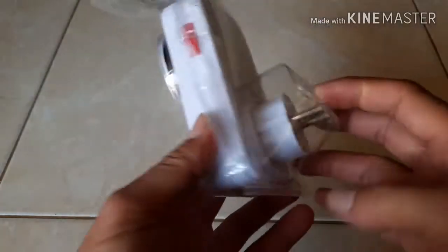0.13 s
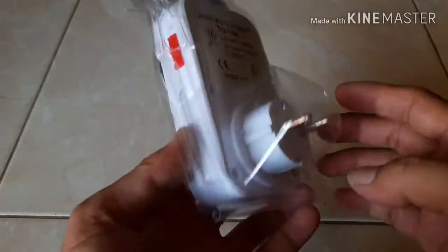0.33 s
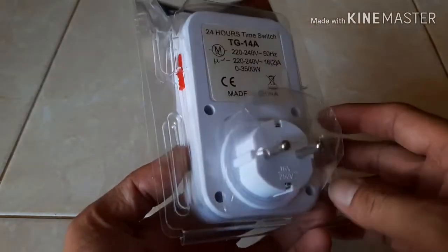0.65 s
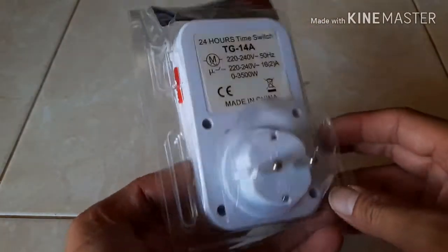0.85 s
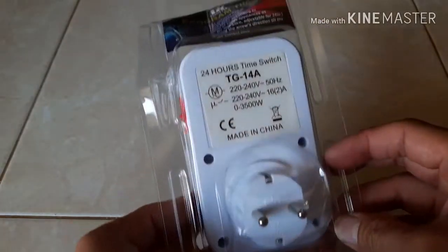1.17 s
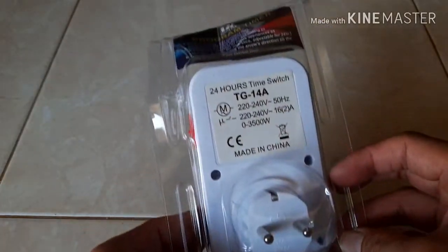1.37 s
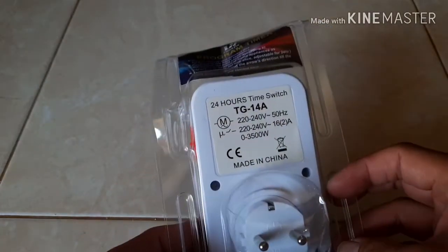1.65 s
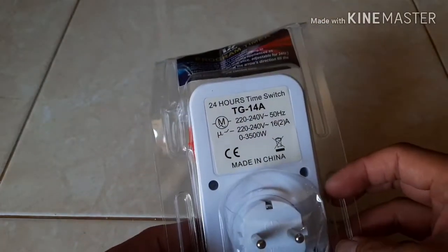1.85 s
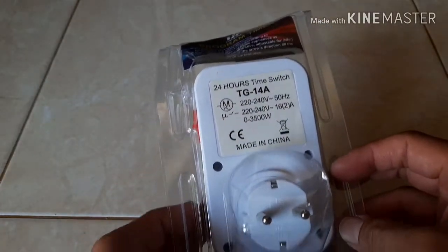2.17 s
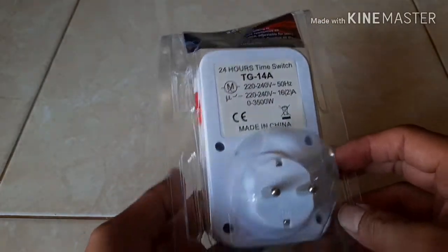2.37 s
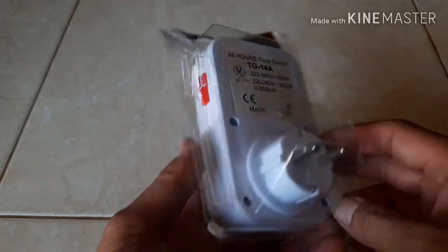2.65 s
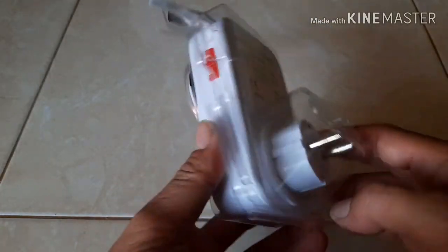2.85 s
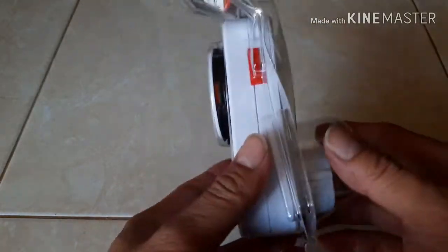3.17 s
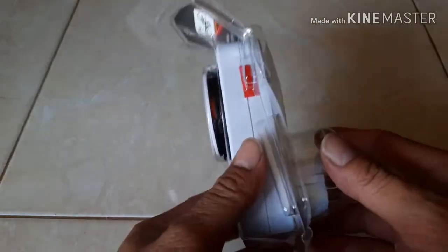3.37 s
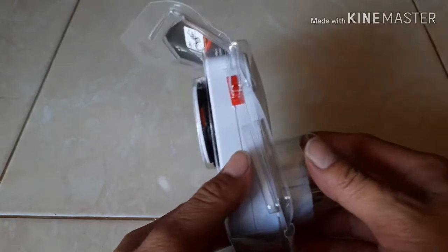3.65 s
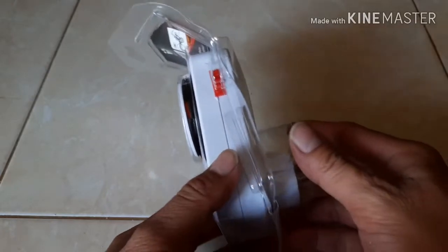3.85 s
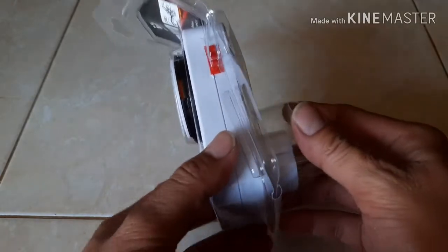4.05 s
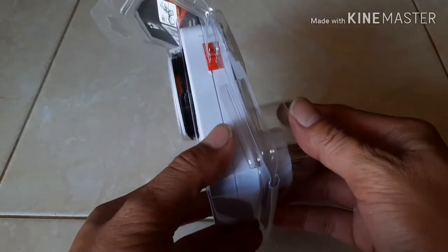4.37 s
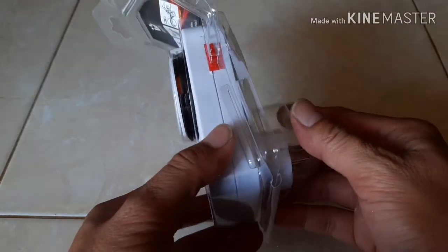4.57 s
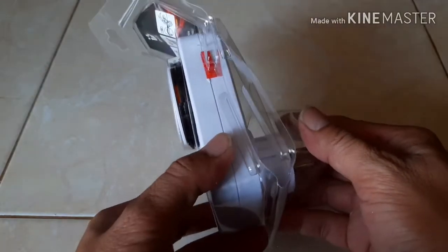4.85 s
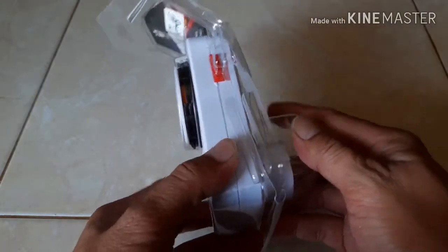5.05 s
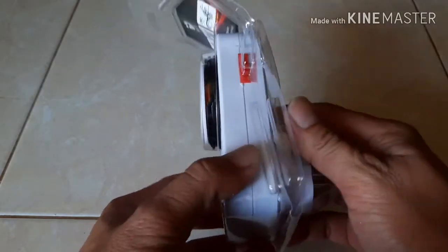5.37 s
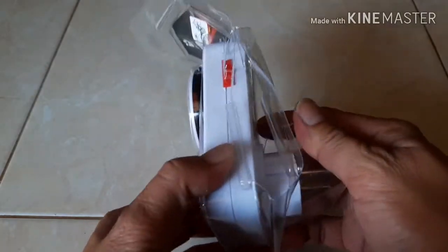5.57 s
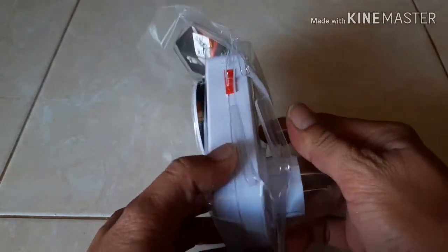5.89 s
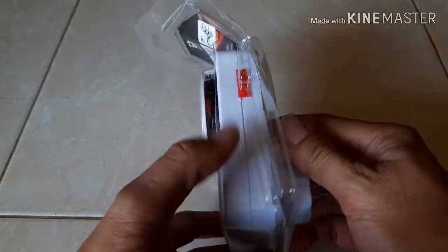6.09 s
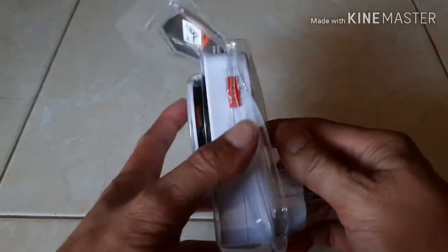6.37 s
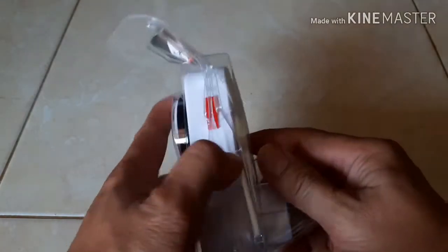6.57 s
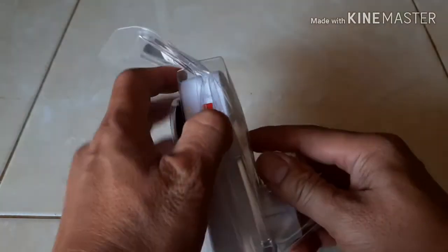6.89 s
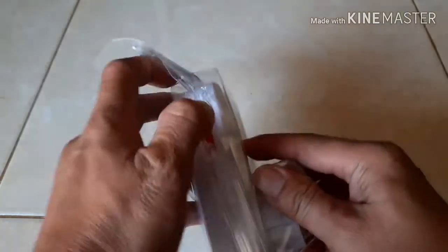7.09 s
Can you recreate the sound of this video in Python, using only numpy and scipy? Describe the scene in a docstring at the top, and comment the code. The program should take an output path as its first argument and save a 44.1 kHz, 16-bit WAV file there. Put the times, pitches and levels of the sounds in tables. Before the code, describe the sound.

A stiff plastic shell is handled very close to a stereo phone microphone in a bare, tiled room with a short faint tail. Two crisp snaps with rubbing come at 0.1 and 0.25 s, then small ticks and a crackle near 0.7 s. From 0.8 to 2.3 s handling stops: low traffic rumble, a wavering deep engine drone and two barely audible hoarse rooster notes around 0.5 and 0.8 s. Faint creaks start at 2.4 s, with brittle clicks and squeaky rubs at 3.0-3.15 s. Sparse tiny ticks follow, while a distant motorbike murmurs from 4 s; a thin high insect wavers very faintly. A clear pop at 5.0 s leads to crackling, a huge sharp crack at 5.55 s and a duller snap with thud at 5.7 s. More snaps land at 6.05, 6.6 and 6.75 s, then gritty rubbing, bumps and crackles until 7.2 s.

```python
"""Prising open a blister pack

Hands turn a plug-in timer in its stiff clear shell above a tiled floor and prise it apart. Buckling patches
snap as bursts of slips through shell modes, dull bumps stir the low ones, fingers rub as gritty noise.
Echoes and a decaying noise tail make the bare room. Outside: traffic noise, two engines built from sines,
a far rooster as a roughened tone, an insect as narrow noise. A phone with two ports listens closely."""
import sys
import numpy as np
from scipy import signal
from scipy.fft import rfft, irfft
from scipy.io import wavfile
from scipy.ndimage import uniform_filter1d

SR = 44100
rng = np.random.default_rng(int(sys.argv[2]) if len(sys.argv) > 2 else 0)


def generate_wav(signal):
    """Clip the signal to [-1, 1] and save it as 16-bit WAV at the path in sys.argv[1]."""
    frames = np.transpose(np.atleast_2d(signal))
    scaled = np.clip(frames, -1, 1) * 32767
    pcm = np.round(scaled).astype(np.int16)
    wavfile.write(sys.argv[1], SR, pcm)


N = 318843

# Buckling patches of the shell: (time [s], patch pitch [Hz], ring peak [dB], knock against ring [dB],
# crack against ring [dB], sizzle against ring [dB], slip decay time [ms], patch against shell modes [dB],
# after-crackle against peak [dB])
SNAPS = [(0.096, 1590, -27.5, -15, -10.5, -13, 2.06, 12, -30.5),
         (0.261, 1270, -30, -6.5, -20, -26, 2.5, 16.5, -22), (0.467, 1420, -55.5, -6, -21, -7, 22, 31, -22),
         (0.526, 1270, -49.5, -7, -4, 1.5, 0.86, 18, -25), (0.615, 1720, -57.5, 1, -3, 0.5, 3.2, 12, -25),
         (0.693, 1730, -55, -3, -11, -4, 9, 12, -25), (0.727, 1524, -43, 2, -9.5, -3.5, 3, 19, -23.5),
         (0.732, 1100, -39, -15, -13, -24, 0.62, 16, -20.5),
         (2.463, 2530, -55, -6, -13, -32, 27, 11.5, -21), (2.497, 1340, -54, -29, -12, -20, 3.8, 16, -24),
         (2.52, 1350, -62, -18, -6, -11, 1, 12, -10.5), (2.609, 1360, -54.5, 0.5, -10, 7.5, 5.2, 11, -30),
         (2.684, 1380, -62.5, 10.5, -11, -15, 1.5, 18, -31),
         (2.738, 1600, -52.5, -7, -10, 5.5, 2.8, 22, -15.5),
         (3.021, 1150, -36, -2.5, -25, -21, 2.1, 13, -21.5), (3.059, 2520, -52, 5, -4, -20.5, 1.7, 3, -31),
         (3.067, 1410, -62, -22, -1, 12, 1.6, 12, -23), (3.119, 1590, -34.5, 1, -18, -25, 3.2, 25, -29.5),
         (3.14, 1760, -48, 0, 0.5, -2.5, 0.9, 17, -29), (3.625, 930, -66, -8, -3, -11, 0.86, 10, -15),
         (3.783, 930, -72, 19, 0, -4, 3.5, 15, -25), (3.904, 1110, -73.5, 15, -12, -16, 5.1, 10.5, -20),
         (4.201, 1190, -58, 2, -20, -30, 3.3, 20, -27), (4.208, 1930, -52.5, 6, -20, -36, 2.9, -9, -28),
         (4.218, 1170, -44.5, -9, -18, -44, 0.85, 16, -26),
         (4.968, 1226, -48, -0.5, -16, -38, 0.73, 14, -17.5),
         (5.02, 1620, -28.5, -22.5, -35, -34, 1.8, -7, -40),
         (5.119, 1050, -58, 15.5, -16, -21, 0.39, 4, -26), (5.139, 1250, -61.5, 8.5, -16, -5, 3.5, 21, -15),
         (5.213, 1800, -62.5, -4.5, -19, -3, 2.5, 12, -13), (5.293, 935, -57.5, -5.5, -1, -5, 2, 11, -28.5),
         (5.302, 1830, -56.5, 0, -1, 1.5, 1.4, 16, -24), (5.33, 1850, -46.5, -3.5, -7, -6.5, 5.2, 7.5, -19),
         (5.378, 1210, -56.5, 7, -14, -15, 0.62, 13, -14.5),
         (5.444, 1800, -38, -8.5, -7.5, -13, 1.9, 5, -27), (5.516, 1850, -53.5, 0, -6, -8, 1.5, 16, -19.5),
         (5.5485, 1930, -10.5, -13, -10.5, -26, 2.1, 9, -29),
         (5.576, 910, -39.5, 7.5, -17, -14, 0.65, 20, -14), (5.658, 1580, -53, -8, -9, -3, 1.2, 1.5, -20),
         (5.695, 1195, -25, -10, -12, -14.5, 2.25, 15.5, -29.5),
         (5.702, 1264, -42.5, 13.5, -21, -27, 2.4, 14, -47),
         (6.0439, 1900, -25, -6.5, -1, 4.5, 2.7, 23.5, -24), (6.063, 1284, -37.5, -2, -8, -20, 3.9, 9, -12),
         (6.165, 1260, -53, -1, 5, 15, 1.4, 6.5, -40.5),
         (6.259, 1200, -67.5, 5.5, -5, 8.5, 5.5, 5.5, -22.5),
         (6.342, 2000, -61.5, 4.5, -6, -6, 2.6, 13, -30), (6.415, 960, -63, 2.5, -3.5, 13.5, 1.9, 10, -20),
         (6.426, 2090, -51, -1.5, -4.5, -4.5, 3.8, 12, -19),
         (6.536, 2820, -42.5, -12, -8, -8.5, 4.1, 6, -26),
         (6.563, 1300, -47.5, -27, -15, -21, 1.2, -2, -16),
         (6.586, 1910, -18.5, -23.5, -6.5, -25, 1.93, 12, -22),
         (6.747, 1960, -27, -5.5, -3.5, -4, 1.86, 25, -32),
         (6.752, 1530, -30.5, -0.5, -9, -20, 1.65, 7, -26.5),
         (6.848, 1900, -51.5, -23, -1, 0.5, 1.8, 10, -24.5), (6.879, 1910, -40, -4, -6.5, -8, 3.2, 14, -32),
         (7.047, 1820, -43, -6, -3, -14, 3, 8, -14.5), (7.069, 1030, -46.5, -20, 0, 1, 1.8, 20, -14.5),
         (7.096, 1920, -47, 2.5, -1.5, -2, 0.63, 6, -9.5),
         (7.209, 1660, -43, -2, -4.5, -11.5, 1.8, 12, -21)]
# Dull bumps of the timer against the shell: (time [s], peak level [dB])
BUMPS = [(.098, -41.5), (.467, -45.5), (.728, -43.5), (2.686, -43.5), (3.121, -41), (3.784, -46),
         (4.271, -53), (5.121, -44), (5.198, -47.5), (5.444, -42.5), (5.701, -31), (6.061, -30.5),
         (6.424, -45), (6.878, -42.5), (7.07, -39.5), (7.096, -33)]
# Modes of shell and timer case: (pitch [Hz], width [Hz], gain [dB])
SHELL_MODES = [(162, 93, 5), (313.6, 110, 8.5), (440, 13, -8), (672, 287, 11), (754, 96, 1),
               (1270, 440, 8.5), (1440, 1400, 0), (1650, 650, -3), (1874, 500, 5), (2470, 170, -3),
               (2950, 460, 0.5), (3780, 850, -7.5), (4540, 1800, 10), (6060, 760, 1), (6540, 4200, 6),
               (9100, 1500, 10), (9800, 3600, -1.5), (14500, 5300, 2)]
# Registers of the shell, in order thump, knock, ring, crack, sizzle, middle, top: (low [Hz], high [Hz])
REGISTERS = [(120, 500), (500, 950), (950, 2400), (2400, 4000), (6000, 10000), (4000, 6000), (10000, 15800)]
# Slips heard by one port only, against the shared slips, one entry a register: (amplitude ratio)
UNLIKE = [2.2, 0.25, 0.14, 0.086, 0.46, 2.02, 2.2]
# Strokes of fingers sliding and creasing:
# (time [s], length [ms], shell rumble [dB], skin hiss [dB], ridge squeak [dB])
RUBS = [(0, 105, -69, -67, -67), (0.09, 138, -60, -63, -63.5), (0.27, 190, -80, -71.5, -77),
        (.47, 280, -77, -79.5, -77), (.7, 260, -76, -71, -73.5), (2.333, 67, -81, -76, -73),
        (2.454, 75, -83, -80, -70), (2.569, 210, -68.5, -71.5, -72), (2.718, 66, -60.5, -58, -59.5),
        (2.899, 102, -77, -76, -67), (2.965, 112, -63, -60, -55), (3.13, 52, -65, -72, -72),
        (3.76, 90, -87, -78.5, -78), (4.21, 117, -72, -99, -86), (4.999, 100, -60.5, -78, -66),
        (5.12, 233, -72.5, -74.5, -70), (5.285, 130, -68, -69.5, -65), (5.44, 63, -59.5, -70, -66.5),
        (5.6, 75, -49.5, -87, -59), (6.06, 152, -66, -70.5, -61), (6.41, 38, -66, -75, -61.5),
        (6.517, 86, -73, -63.5, -59), (6.621, 107, -55, -60, -55), (6.71, 65, -56.5, -54, -54),
        (6.76, 194, -61, -66.5, -69), (7.039, 97, -57, -52, -49.5), (7.12, 90, -65, -66, -54.5)]
# Spectrum of the grit that feeds the skin hiss: (frequency [Hz], relative level [dB per Hz])
SKIN_SPECTRUM = [(2000, 7), (2600, -5.5), (3300, 2), (4100, 3.5), (8000, 6.5), (11300, 3), (15500, -6)]
# Parts of the skin hiss that flare alone: (centre [Hz], width [Hz])
HISS_MODES = [(3250, 200), (4900, 2300), (6400, 2300), (8900, 1900), (11000, 1300), (12800, 1700),
              (15000, 4600)]
# Ridges under the finger: (pitch [Hz], width [Hz], relative gain [dB])
SQUEAK_MODES = [(1820, 490, 3), (3430, 900, -9)]
# Room tail by band: (centre [Hz], 60 dB decay time [s], level [dB])
ROOM_BANDS = [(280, 0.41, -50.5), (550, 0.3, -47), (1340, 0.12, -66.5), (3200, 0.31, -46),
              (5960, 0.3, -50.5), (12000, 0.34, -41)]
# Echoes of floor and hand: (left delay [ms], level [dB], right delay [ms])
CLOSE_ECHOES = [(1.3, -26.5, 1), (2.6, -17, 4)]
# Traffic spectrum: (frequency [Hz], relative level [dB per Hz])
TRAFFIC_SPECTRUM = [(18, -38.5), (30, -1.5), (81, 0.5), (140, 1.5), (208, -6), (256, -8.5), (389, -25.5),
                    (575, -39.5), (808, -40.5), (1050, -44.5), (1870, -46.5), (3590, -55), (8280, -57.5),
                    (15500, -56.5)]
# Swell of the traffic bass: (time [s], level [dB])
TRAFFIC_SWELL = [(0.0, -53.5), (2.07, -54.5), (2.84, -57), (4.07, -54), (4.45, -52), (6.54, -53.5),
                 (6.72, -53.5), (7.23, -57)]
# Swell of the faint street treble: (time [s], level [dB])
AIR_SWELL = [(0, -65), (1, -70), (2.5, -71.5), (5.9, -71.5), (6.6, -63), (6.98, -64), (7.23, -61)]
# How alike the street is at both ports: (frequency [Hz], left-right correlation [-1 to 1])
LIKENESS = [(60, 0.89), (130, 0.92), (290, 0.71), (640, 0.056), (1400, 0.033), (15000, 0.041)]
# Big slow engine: (time [s], pitch [Hz], level [dB])
DRONE = [(0.0, 50.7, -47), (0.5, 51.42, -60), (1.23, 49.1, -47), (1.39, 48.8, -58.5), (1.6, 47.6, -45),
         (1.83, 47.06, -52.5), (2.22, 45.74, -46.5), (2.63, 47, -62), (3.11, 57.6, -60), (3.6, 58.4, -63.5)]
# Motorbike: (time [s], firing rate [Hz], level [dB])
BIKE = [(4.0, 38.85, -58), (4.64, 42.1, -54), (5.76, 43.47, -73), (6.29, 46.7, -82), (6.73, 38.48, -53),
        (7.23, 40.97, -59.5)]
# Motorbike harmonics: (multiple of firing rate, relative level [dB])
BIKE_ORDERS = [(2, -4.5), (3, 0), (4, -2), (5, -4.5), (6, -26.5)]
# Rooster calls: (time [s], length [s], pitch [Hz], level [dB])
CROWS = [(0.467, 0.18, 1444, -72), (0.819, 0.2, 1457, -70.5)]

SETTLE_S, RISE_MS = 0.023, 0.75  # after-crackle decay, onset of a snap
LEAD_DB = 16  # main slip against the others
THUMP_DB = -18  # lowest register, against the mean of knock and ring
SNAP_PAN_DB, SNAP_PAN_SPREAD_DB = 0.5, 0.5  # left minus right: mean, spread
PORT_LAG_MS = 0.097  # the right port hears a snap this much later
BUMP_MS = 5.1  # decay time
CROW_ATTACK_S, CROW_ECHO_DB, CROW_ECHO_S = 0.018, -10.5, 0.31
CROW_SAG_HZ_PER_S = 150  # the fading end sinks in pitch
INSECT_HZ, INSECT_WIDTH_HZ, INSECT_WAVER_PER_S = 8330, 190, 24
INSECT_DB, INSECT_RISE_S = -89.5, 2.3  # steady song and its fade-in
INSECT_PEAK_DB, INSECT_PEAK_S, INSECT_SWELL_S = -91, 2.9, 0.6  # swell added to it
SHELF_HZ, TOP_HZ = 15450, 16720


def undb(db):
    """Turn decibels into an amplitude factor."""
    return 10 ** (np.asarray(db) / 20)


def unit(x):
    """Scale each channel to an RMS of 1."""
    return x / np.sqrt(np.mean(x ** 2, axis=-1, keepdims=True))


def curve(table):
    """Columns over time, and a gate that is open, with soft edges, from the first row to the last."""
    s, *columns = np.transpose(table)
    t = np.arange(N) / SR
    is_on = 1. * ((t >= s[0]) & (t <= s[-1]))
    return [np.interp(t, s, c) for c in columns], uniform_filter1d(is_on, size=900)


def colour(x, points):
    """Weight noise by a spectrum of (frequency [Hz], level [dB]) points."""
    f = np.maximum(np.arange(x.shape[-1] // 2 + 1) * SR / x.shape[-1], 1)
    hz, db = np.transpose(points)
    gain = undb(np.interp(np.log(f), np.log(hz), db))
    return irfft(rfft(x) * gain, x.shape[-1])


def ring(x, hz, width):
    """One resonance, gain 1 at its centre."""
    return signal.lfilter(*signal.iirpeak(hz, hz / width, fs=SR), x)


def walk(rate):
    """Random levels held 1 / rate s and smoothed twice; spread near 1."""
    k = int(SR / rate)
    held = np.repeat(rng.standard_normal(N // k + 1), k)
    return 1.32 * uniform_filter1d(uniform_filter1d(held, k), k)[:N]


def register(x, low_hz, high_hz):
    """The shell modes that lie between two pitches, with steep skirts."""
    y = sum((-1) ** k * undb(db) * ring(x, hz, width)
            for k, (hz, width, db) in enumerate(SHELL_MODES) if low_hz < hz < high_hz)
    skirts = signal.butter(3, [.9 * low_hz, 1.1 * high_hz], "band", fs=SR, output="sos")
    return signal.sosfilt(skirts, y)


def snaps():
    """Each buckle is a quick burst of slips; the patch adds its own pitch to the shell modes."""
    out, t = np.zeros((2, N + 5000)), np.arange(4096) / SR
    rise = np.minimum(t / (RISE_MS / 1000), 1) ** 2
    for s, hz, ring_db, knock, crack, sizzle, ms, patch_db, settle_db in SNAPS:
        decay = np.exp(-t / (ms / 1000))
        # the creases crackle on as they relax
        settle = undb(2.8 * rng.exponential(size=4096)) * np.exp(-t / SETTLE_S)
        shapes = rise * np.array([[decay], [settle]])
        # axes: register, burst or after-crackle, (shared, left only, right only), sample
        slips = rng.standard_normal((7, 1, 3, 4096)) * shapes
        # one main slip leads the burst
        slips[:, 0, 0, int(RISE_MS * SR / 1000)] += undb(LEAD_DB)
        # each register is shaken by slips of its own
        parts = [register(x[:, :1] + share * x[:, 1:], *edges)
                 for x, share, edges in zip(slips, UNLIKE, REGISTERS)]
        patch = ring(slips[2, :, :1], hz, hz / 6)
        patch = ring(ring(patch, hz, hz / 1.2), hz, hz / 1.5)
        parts[2] += undb(patch_db) * patch
        middle = 0.52 * crack + 0.64 * sizzle + 0.84  # between crack and sizzle
        # dull snaps lose the top octave, bright ones gain it
        top = sizzle - 3.5 + 0.24 * min(sizzle, 0) + 0.2 * max(sizzle, 0)
        levels_db = ring_db + np.array([THUMP_DB + knock / 2, knock, 0, crack, sizzle, middle, top])
        both = np.zeros((2, 4096))
        for db, (burst, tail) in zip(levels_db, parts):
            burst = burst / np.abs(burst.mean(axis=0)).max()
            tail = tail / tail[:, :int(SETTLE_S * SR)].std()
            both += undb(db) * (burst + undb(settle_db) * tail)
        pan_db = SNAP_PAN_DB + SNAP_PAN_SPREAD_DB * rng.standard_normal()
        i = int(s * SR)
        out[0, i:i + 4096] += both[0] * undb(pan_db / 2)
        out[1, i:i + 4096] += np.interp(t - PORT_LAG_MS / 1000, t, both[1]) * undb(-pan_db / 2)
    return out[:, :N]


def bumps():
    """A soft blow stirs only the lowest modes of shell and case."""
    out, t = np.zeros(N + 4096), np.arange(4096) / SR
    for s, db in BUMPS:
        blow = rng.standard_normal(4096) * np.exp(-t / (BUMP_MS / 1000))
        thud = register(blow, *REGISTERS[0])
        out[int(s * SR):int(s * SR) + 4096] += undb(db) * thud / np.abs(thud).max()
    return out[:N]


def rubs():
    """Dense uneven slips swell with each stroke: a hiss off the skin, a rumble and squeak in the shell."""
    unevenness_db = 2.2 * rng.exponential(size=N) + 1.6 * walk(120)
    grit = rng.standard_normal((3, N)) * undb(unevenness_db)  # shared, left, right
    skin = colour(grit[1:] + 0.13 * grit[0], SKIN_SPECTRUM)
    # the contact wanders, so each part of the hiss flares alone
    hiss = unit(sum(undb(2.5 * walk(25)) * ring(skin, hz, width) for hz, width in HISS_MODES))
    drag = grit[1:] + .5 * grit[0]
    rumble = unit(register(drag, 390, 1500))
    squeak = unit(sum(undb(db + 4.4 * walk(90)) * ring(ring(drag, hz, width), hz, 2 * width)
                      for hz, width, db in SQUEAK_MODES))
    gains = np.zeros((3, N + SR))
    for s, ms, *levels_db in RUBS:
        swell = np.sin(np.linspace(0, np.pi, int(ms * SR / 1000))) ** 1.1
        i = int(s * SR)
        gains[:, i:i + len(swell)] += undb(levels_db)[:, None] * swell
    rumble_gain, hiss_gain, squeak_gain = gains[:, :N]
    shell = rumble_gain * rumble + squeak_gain * squeak
    # both lean left, the hiss further
    return shell * undb([[.8], [-.8]]) + hiss_gain * hiss * undb([[1.8], [-1.8]])


def room(x):
    """Close echoes off hard surfaces, then a dense tail that dies band by band."""
    t = np.arange(SR // 2) / SR
    response = sum(undb(db - 60 * t / t60) * unit(ring(rng.standard_normal((2, len(t))), hz, 0.55 * hz))
                   for hz, t60, db in ROOM_BANDS)
    response *= np.clip(t / 0.018, 0, 1)  # the tail builds up over 18 ms
    response[:, 0] = 1  # direct sound
    for left_ms, db, right_ms in CLOSE_ECHOES:
        response[0, int(left_ms * SR / 1000)] += undb(db)
        response[1, int(right_ms * SR / 1000)] += undb(db)
    return signal.fftconvolve(x, response, axes=1)[:, :N]


def street():
    """Traffic noise: bass alike at both ports and swelling, treble thin and unlike."""
    hz, like = np.transpose(LIKENESS)
    # the balance of mid and side sets how alike the ports are
    mid = colour(rng.standard_normal(N), np.transpose([hz, 10 * np.log10(1 + like)]))
    side = colour(rng.standard_normal(N), np.transpose([hz, 10 * np.log10(1 - like)]))
    noise = unit(colour(np.array([mid + side, mid - side]), TRAFFIC_SPECTRUM))
    low = signal.sosfilt(signal.butter(4, 450, fs=SR, output="sos"), noise)
    high = unit(signal.sosfilt(signal.butter(4, 450, "high", fs=SR, output="sos"), noise))
    low_db = curve(TRAFFIC_SWELL)[0][0] + 0.5 * walk(7.1)
    high_db = curve(AIR_SWELL)[0][0] + 0.5 * walk(29.0)
    return low * undb(low_db) + high * undb(high_db)


def engines():
    """A wavering low drone, and a motorbike's firing harmonics that slide down at a gear change."""
    (hz, db), on = curve(DRONE)
    drone = on * undb(db) * np.sqrt(2) * np.sin(2 * np.pi * np.cumsum(hz) / SR)
    (hz, db), on = curve(BIKE)
    phase = 2 * np.pi * np.cumsum(hz * (1 + 0.0051 * walk(11))) / SR  # slightly uneven firing
    bike = on * sum(undb(db + order_db + walk(0.75)) * np.sin(k * phase + k * k)
                    for k, order_db in BIKE_ORDERS)
    return drone + bike


def animals():
    """A hoarse far crow, blurred by distance, and an insect that wavers on one high note."""
    t = np.arange(N) / SR
    waver_db = 2.5 * walk(INSECT_WAVER_PER_S) + walk(4)
    song = undb(INSECT_DB) * np.minimum(t / INSECT_RISE_S, 1)
    song += undb(INSECT_PEAK_DB) * np.exp(-((t - INSECT_PEAK_S) / INSECT_SWELL_S) ** 2)
    note = unit(ring(rng.standard_normal((2, N)), INSECT_HZ, INSECT_WIDTH_HZ))
    out = note * song * undb(waver_db)
    for s, length, hz, db in CROWS:
        late = np.maximum(t - s - length, 0)  # time since the call ended
        attack = np.clip((t - s) / CROW_ATTACK_S, 0, 1)
        echo = undb(CROW_ECHO_DB) * np.exp(-late / CROW_ECHO_S)
        shape = attack * np.maximum(1 - late / CROW_ATTACK_S, echo)
        # random amplitude and phase roughen the tone, apart at each port
        hoarse = 1 + 1.1 * np.array([walk(150) + 1j * walk(150), walk(150) + 1j * walk(150)])
        tone = np.exp(2j * np.pi * np.cumsum(hz - CROW_SAG_HZ_PER_S * late) / SR)
        out += shape * undb(db) * np.imag(hoarse * tone)
    return out


def scene():
    """Handling sounds in the room, over an outside that leans left."""
    outside = (street() + engines() + animals()) * undb([[.7], [-.7]])
    return room(snaps() + bumps() + rubs()) + outside


def record(dry):
    """The phone drops the deepest bass, steps the last treble down and cuts the top."""
    x = signal.sosfilt(signal.butter(6, 39, "high", fs=SR, output="sos"), dry)
    x = signal.sosfilt(signal.ellip(5, .3, 26, SHELF_HZ, fs=SR, output="sos"), x)
    return signal.sosfilt(signal.ellip(10, .2, 70, TOP_HZ, fs=SR, output="sos"), x)


dry = scene()
out = record(dry)
generate_wav(out)
```